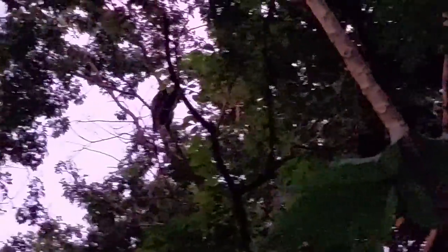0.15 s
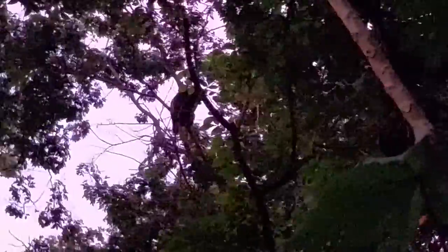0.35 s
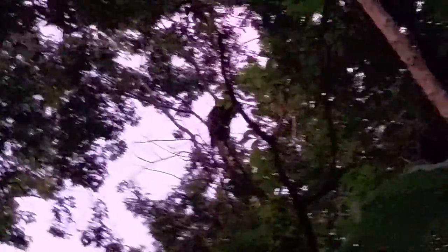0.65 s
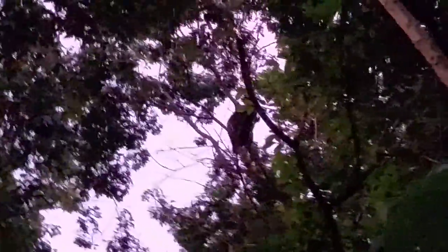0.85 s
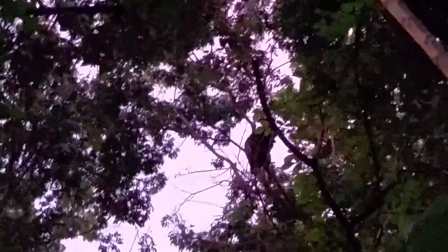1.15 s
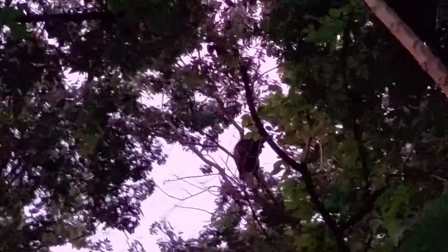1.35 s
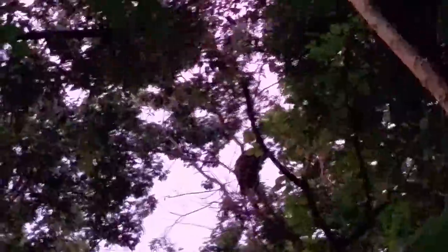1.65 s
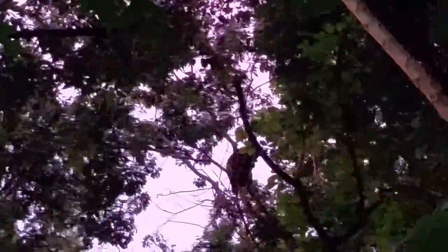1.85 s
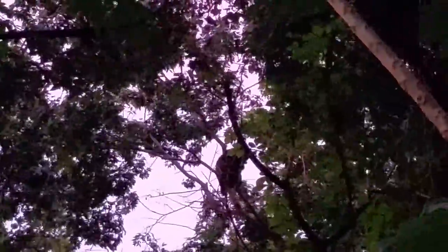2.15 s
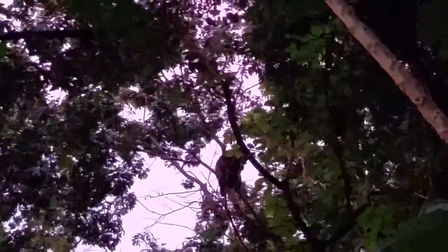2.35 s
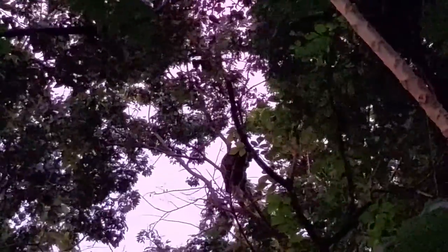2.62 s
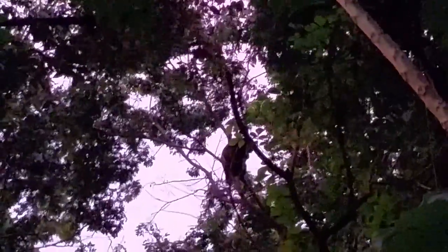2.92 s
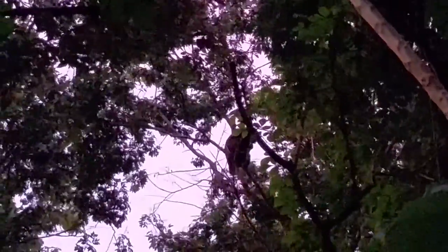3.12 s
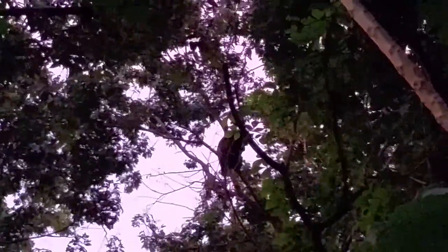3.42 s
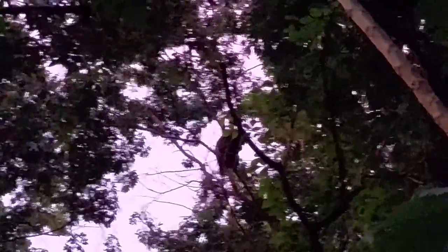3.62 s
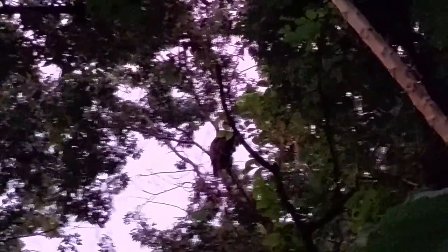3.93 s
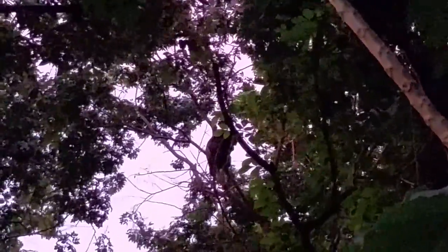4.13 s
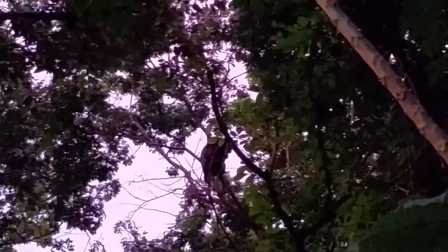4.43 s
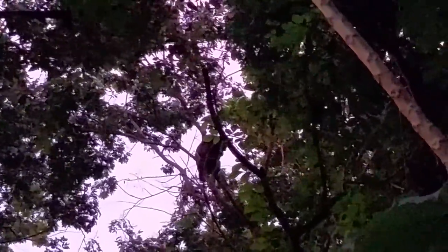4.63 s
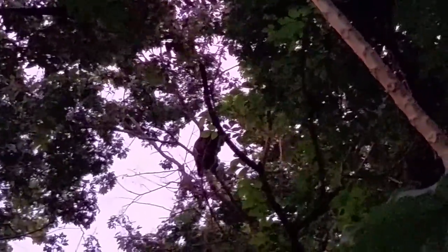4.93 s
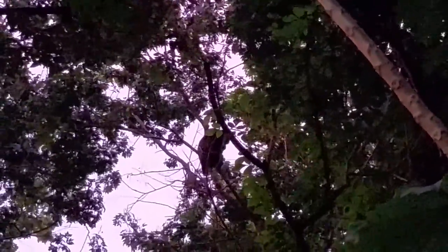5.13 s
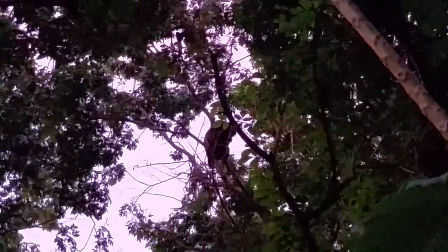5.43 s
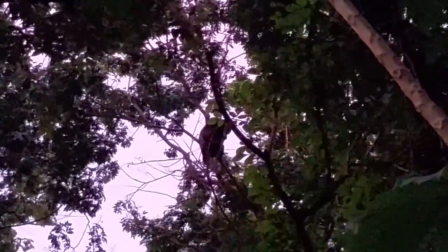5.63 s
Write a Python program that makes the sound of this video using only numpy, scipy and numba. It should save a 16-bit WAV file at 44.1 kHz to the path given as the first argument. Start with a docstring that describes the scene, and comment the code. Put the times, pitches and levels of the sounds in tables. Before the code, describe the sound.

Deep, hollow, raspy monkey barks come in quick pairs, then singly, then fade to a short muffled grunt, echoing between trees. Thin cricket trills flutter throughout and a katydid rasps three quick runs of ticking chirps. Late on, a twig cracks lightly. A far motor drones under a dull outdoor rumble, all heard by a single mono microphone below the canopy.

```python
"""A howler monkey barks from a treetop at dusk: two double barks, a single one and a soft grunt, ringing on
in the forest. Rough throat pulses ring the sac and mouth, and puffs of air ring the higher resonances.
A cricket trills on a fluttering tone, a katydid scrapes three runs of chirps from swelling file strokes,
a twig snaps as decaying sines, and a motor hums far off as three thin lines.
Shaped noise gives a low rumble and faint hiss; one microphone hears it all."""
import sys
import numpy as np
from scipy import signal
from scipy.fft import rfft, irfft, next_fast_len
from scipy.io import wavfile
from scipy.ndimage import uniform_filter1d, minimum_filter1d
from numba import njit

SR = 44100
rng = np.random.default_rng(int(sys.argv[2]) if len(sys.argv) > 2 else 0)


def dump_mix(stems):
    """Bounce the given channels to the path in sys.argv[1] as a 16-bit WAV at rate SR."""
    frames = np.atleast_2d(stems).T  # one column per channel
    limited = np.clip(frames, -1, 1)  # hard clip at full scale
    pcm = np.round(limited * 32767).astype(np.int16)
    wavfile.write(sys.argv[1], SR, pcm)


N = 254626
TIME = np.arange(N) / SR  # s

# Cricket trills. Each row: start in seconds, length in seconds, relative level in dB.
TRILLS = [(-0.08, 0.17, -64), (0.252, .14, -56), (1.760, .09, -50.5), (2.260, 0.2, -60.5),
          (2.715, 0.16, -58.5), (3.243, 0.15, -56.5), (3.375, .22, -65.5), (3.678, .19, -58),
          (3.977, 0.14, -59.5), (4.171, .15, -56.5), (4.540, 0.14, -62.5), (4.734, 0.2, -61),
          (5.06, .34, -62), (5.696, .15, -59.5)]
TRILL_ATTACK_S, TRILL_RELEASE_S = 0.032, 0.045

# Distant motor. Each row: time in seconds, relative level of the shaft line in dB, of the wavering line in dB.
MOTOR = [(0.0, -39.5, -33.5), (1.979, -39, -30), (5.77, -40.5, -41.5)]

# Spectrum of the far rumble and air. Each row: frequency in Hz, relative density in dB per Hz.
AIR_SPECTRUM = [(15, -38), (25, -45.5), (60, -1), (114, -2), (194, -5), (240, -9), (289, -14), (506, -24.5),
                (696, -23), (1590, -46.5), (5400, -53), (6010, -51), (14400, -53)]
# Boost of the middle range, loud at the start and then sinking, before its wavering. Each row: time in seconds,
# gain in dB.
MIDDLE_BOOST = [(0, 9.5), (0.6, 5.5), (4.4, 0.5), (4.95, -2.5)]

# Katydid runs of six chirps. Each row: first chirp in seconds, last chirp in seconds, how early the middle
# ones come in seconds, relative level in dB, crescendo in dB per chirp.
CHIRP_RUNS = [(0.495, 0.888, 0.001, -41, 2.1), (2.780, 3.184, 0.009, -38.5, -0.3),
              (5.168, 5.558, 0.0, -38.5, 1.8)]
RUN_ARCH_DB = 4  # the ends of a run are about this much softer than its middle

# Barks, the first a faint catch of the throat, the last two a soft grunt.
# Each row: start in seconds, crest of effort in seconds, end in seconds, attack in seconds, release in seconds,
# sag of sac and mouth in dB/s, sac level in dB, mouth level in dB, upper resonance level in dB, rasp gain in dB,
# tone over roughness at the start in dB, open mouth in Hz, upper whistle in Hz, whistle level in dB.
BARKS = [(0.503, 0.515, 0.545, 0.0082, 0.024, 20, -32.5, -46, -65.5, -65.5, -1.5, 859.4, 4500, -69.5),
         (0.526, 0.589, 0.710, 0.024, 0.087, 21, -15, -22, -37.5, -53.5, -1.5, 847.8, 4560, -49),
         (0.683, 0.782, 1.024, 0.027, 0.033, 48, -15.5, -14, -31, -49, -2, 745, 5920, -37.5),
         (1.198, 1.280, 1.398, 0.032, 0.025, 46, -11, -14, -32, -47, -2, 833, 6060, -45),
         (1.399, 1.523, 1.659, 0.034, 0.045, 4.5, -12, -13.5, -31, -45.5, -1, 826, 5540, -42.5),
         (1.923, 1.991, 2.224, 0.028, 0.15, 28, -11, -17.5, -36, -48.5, -4.5, 827.5, 6140, -46),
         (2.521, 2.574, 2.608, 0.067, 0.033, 29.5, -20, -40, -66, -81, 6, 855.6, 6070, -89),
         (2.590, 2.611, 2.747, 0.03, 0.083, 47.5, -18, -34.5, -62, -79, 3, 852, 5996, -86.5)]
# Effort climbs to each crest and ebbs after it; sac and mouth follow only the climb.
CLIMB_DB_PER_S, EBB_DB_PER_S = 118.5, 109
# How much of that swing each part of the voice follows, in dB per dB.
SAC_FOLLOWS, MOUTH_FOLLOWS, RASP_FOLLOWS, WHISTLE_FOLLOWS = 0.6, 0.6, 0.76, 1.8
# The sac rests on one note; the mouth glides to its closed note shortly after each crest.
SAC_HZ, CLOSED_MOUTH_HZ, MOUTH_HOLD_S, MOUTH_CLOSE_S = 442.6, 762.3, 0.012, 0.055
# After the crest the folds lock onto the resonances, and the tone grows out of the roughness.
LOCKING_DB, LOCKING_S = 5, 0.07
# Bends of the voice away from its notes and back. Each row: centre in seconds, half length in seconds,
# sac shift in Hz, mouth shift in Hz, extra tone over roughness in dB.
BENDS = [(0.570, 0.064, -27.5, 5, 2), (0.920, 0.052, -120, -125, 0), (1.315, 0.036, 149.5, 44, 5),
         (1.585, 0.060, 69.5, -9, 0.5), (2.66, 0.091, -20, 21, 0)]
# Broad roar under the two low resonances. Each row: frequency in Hz, relative density in dB per Hz.
ROAR_SPECTRUM = [(60, -42), (190, -7), (330, -5), (560, 5), (900, -12), (1040, -17), (1200, -24),
                 (1700, -63), (5000, -90.5)]
ROAR_DB, ROAR_FROM_MOUTH = -2.0, 0.67  # its level follows a blend of the sac's and the mouth's
# High resonances of the throat, rung by the rasp. Each row: mean frequency in Hz, relative level in dB.
RASP_RESONANCES = [(2300, -4), (2900, -9), (3600, -8.5), (4330, -3), (5300, -5.5), (6150, -11), (7150, -10),
                   (8800, -25.5), (12300, -29.5)]
RASP_LAG_S, RASP_WANDER = 0.0069, 0.012  # the rasp starts later than the voice; spread of pitch, as a ratio
# Dip in the rasp's spectrum, lower in the first call. Each row: time in seconds, centre in Hz.
RASP_DIP = [(1.05, 2730), (1.15, 3440)]
RASP_DIP_WIDTH_HZ = 700.0

# Twig cracks. Each row: time in seconds, level in dB to which each resonance's own is added.
CRACKS = [(4.285, -41.5), (4.296, -39)]
# Resonances of the twig. Each row: frequency in Hz, relative level in dB, decay t60 in seconds.
TWIG_RESONANCES = [(1100, -7, 0.013), (1290, 6.5, 0.0091), (1720, -5, 0.015)]

# Forest reverberation. Each row: frequency in Hz, decay t60 in seconds.
FOREST_T60 = [(200, 0.29), (500, 1.98), (1500, 0.66), (4000, 1.4), (9000, 0.2)]
CUTOFF_HZ = 14650


def from_db(db):
    """Decibels to gain."""
    return 10 ** (np.asarray(db) / 20)


def rms_one(x):
    """Scale to an rms of 1."""
    return x / np.sqrt(np.mean(x ** 2) + 1e-20)


def at_hz(points, hz):
    """Read a table on a log-frequency axis."""
    f, value = np.transpose(points)
    return np.interp(np.log(np.maximum(hz, 1)), np.log(f), value)


def colour(x, spectrum):
    """Give a signal a smooth spectrum; rms 1."""
    size = next_fast_len(N + 4096)
    gain = from_db(at_hz(spectrum, np.fft.rfftfreq(size, 1 / SR)))
    return rms_one(irfft(rfft(x, size) * gain, size)[:N])


def drift(rate_hz):
    """Random wander with a spread of 1: noise through two equal low-passes, at a twentieth of the sample rate."""
    r = np.exp(-40 * np.pi * rate_hz / SR)
    noise = rng.standard_normal(N // 20 + 2002)
    slow = signal.lfilter([1], [1, -2 * r, r * r], noise)[2000:]
    return np.interp(np.arange(N) / 20, np.arange(len(slow)), rms_one(slow))


def tone(hz):
    """A sine of rms 1 that follows a pitch curve."""
    return np.sqrt(2) * np.sin(2 * np.pi * np.cumsum(hz) / SR)


def even(x, size=900):
    """Hold the level at rms 1 while keeping the grain of single pulses."""
    power = uniform_filter1d(uniform_filter1d(x ** 2, size), size)
    return x / np.sqrt(np.maximum(power, 1e-12))


def low_pass(x, hz):
    """Steep low-pass."""
    return signal.sosfilt(signal.butter(6, hz, fs=SR, output="sos"), x)


def band_pass(x, low_hz, high_hz, run):
    """Keep one band, with the given filter routine."""
    return run(signal.butter(2, [low_hz, high_hz], "band", fs=SR, output="sos"), x)


@njit
def resonate(x, hz, width):
    """Two-pole resonance with a moving centre."""
    y, r = np.zeros(len(x)), np.exp(-np.pi * width / SR)
    for i in range(2, len(x)):
        drive = (1 - r * r) / 2 * (x[i] - x[i - 2])
        y[i] = drive + 2 * r * np.cos(2 * np.pi * hz[i] / SR) * y[i - 1] - r * r * y[i - 2]
    return y


def twice(x, hz, width_hz):
    """A resonance applied twice, for steep flanks."""
    return resonate(resonate(x, hz, float(width_hz)), hz, float(width_hz))


def gate(start, end, attack, release):
    """Attack, hold and release as straight ramps of gain."""
    return np.clip(np.minimum((TIME - start) / attack, (end - TIME) / release), 0, 1)


def cricket(pitch_hz, wing_hz, flutter_db):
    """Wing strokes run together into a note that flutters in pitch and level."""
    level = np.zeros(N)
    for start, length, db in TRILLS:
        level += from_db(db) * gate(start, start + length, TRILL_ATTACK_S, TRILL_RELEASE_S)
    stroke = np.sin(2 * np.pi * np.cumsum(wing_hz * (1 + 0.41 * drift(12))) / SR)
    pitch = pitch_hz + 22 * stroke + 34 * drift(120)
    flutter = from_db(flutter_db * drift(29) - 3.5)
    return level * (1 + 0.48 * stroke) * flutter * tone(pitch)


def motor(shaft_hz, throb_hz, mains_hz, mains_db):
    """A steady shaft line, a wavering one above it and a thin mains hum."""
    s, shaft_db, throb_db = np.transpose(MOTOR)
    shaft = from_db(np.interp(TIME, s, shaft_db) + 0.5) * tone(shaft_hz + drift(3.4))
    throb_gain = from_db(np.interp(TIME, s, throb_db) - 7.5 + 4.7 * drift(6.1))
    throb = throb_gain * tone(throb_hz + 3.2 * drift(6.3))
    return shaft + throb + from_db(mains_db) * tone(np.full(N, mains_hz))


def air(level_db, waver_db, patchy_db):
    """Far rumble over a faint steady hiss, with a middle-range wash that starts loud, sinks and swells
    unevenly, band by band."""
    noise = colour(rng.standard_normal(N), AIR_SPECTRUM)
    middle_db = np.interp(TIME, *np.transpose(MIDDLE_BOOST)) + waver_db * drift(13.0)
    out = noise
    for low, high in ([280, 500], [500, 950], [950, 1700]):  # Hz
        part = band_pass(noise, low, high, signal.sosfiltfilt)
        out = out + part * (from_db(middle_db + patchy_db * drift(4.9)) - 1)
    return from_db(level_db) * out


def chirps(count=6):
    """Time and level of each chirp: a nearly steady beat, arched in level and tilted by the crescendo."""
    k, ends = np.arange(count), np.linspace(-1, 1, count) ** 2
    runs = []
    for first, last, early, db, crescendo in CHIRP_RUNS:
        times = np.linspace(first, last, count) - early * (1 - ends)
        levels = db + crescendo * (k - k.mean()) - RUN_ARCH_DB * ends
        runs.append(np.column_stack([times, levels]))
    return np.vstack(runs)


def katydid(stroke_gap_s, stroke_s, last_hz, step_hz, sweep_hz, swell_db, count=4):
    """Each chirp is a few swelling file strokes; each slides down and lies on average below the one before."""
    out = np.zeros(N)
    t = np.arange(-256, 256) / SR
    for s, db in chirps():
        # k counts back from the last stroke
        for k, (detune, late, louder) in enumerate(rng.standard_normal((count, 3))):
            hz = last_hz + step_hz * k + 150 * detune
            phase = 2 * np.pi * (hz * t - sweep_hz * t ** 2 / (2 * stroke_s))
            gain = from_db(db - swell_db * k ** 2 + louder)
            at = int((s - k * stroke_gap_s + 0.00083 * late) * SR) - len(t) // 2
            out[at:at + len(t)] += gain * np.exp(-(t / stroke_s) ** 2) * np.sin(phase)
    return out


def effort_db(crest):
    """The climb to a crest of effort, and the whole climb and ebb; 0 dB at the crest."""
    climb = CLIMB_DB_PER_S * np.minimum(TIME - crest, 0)
    return climb, climb - EBB_DB_PER_S * np.maximum(TIME - crest, 0)


def bark_shapes():
    """Gains of sac, mouth, upper resonance and rasp: each bark opens, climbs to its crest, falls, is released."""
    gains = np.zeros((4, N))
    for start, crest, end, attack, release, sag, sac_db, mouth_db, upper_db, rasp_db, *_ in BARKS:
        climb, effort = effort_db(crest)
        sagged = sag * np.maximum(TIME - crest, 0)
        voiced = gate(start, end, attack, release)
        rushing = gate(start + RASP_LAG_S, end, attack, release)
        gains = np.maximum(gains, [voiced * from_db(sac_db + SAC_FOLLOWS * climb - sagged),
                                   voiced * from_db(mouth_db + MOUTH_FOLLOWS * climb - sagged),
                                   voiced * from_db(upper_db + effort),
                                   rushing * from_db(rasp_db + RASP_FOLLOWS * effort)])
    return gains


def throat():
    """Sac pitch, mouth pitch and lock of the folds: each bark resets the mouth and the roughness."""
    mouth_hz, lock_db = np.full(N, float(CLOSED_MOUTH_HZ)), np.zeros(N)
    for start, crest, *_, tone_db, open_hz, _, _ in BARKS:
        now = TIME >= start
        past_crest = TIME[now] - crest
        closed = np.clip((past_crest - MOUTH_HOLD_S) / MOUTH_CLOSE_S, 0, 1)
        mouth_hz[now] = open_hz + (CLOSED_MOUTH_HZ - open_hz) * closed
        lock_db[now] = tone_db + LOCKING_DB * np.clip(past_crest / LOCKING_S, 0, 1)
    bends = np.zeros((3, N))
    for s, half, *change in BENDS:
        bends += np.outer(change, np.exp(-((TIME - s) / half) ** 2))
    sac_bend, mouth_bend, purer_db = bends
    mouth_hz, lock_db = uniform_filter1d([mouth_hz, lock_db], size=900)
    return SAC_HZ + sac_bend, mouth_hz + mouth_bend, from_db(lock_db + purer_db)


def larynx(pulse_hz, jitter, shimmer_db, noise_share):
    """Irregular slaps of the vocal folds, and turbulence that puffs with each slap."""
    cycles = np.cumsum(pulse_hz * np.exp(jitter * drift(60.17))) / SR
    slaps = np.diff(np.floor(cycles), prepend=0) * from_db(shimmer_db * drift(75))
    puffs = rms_one(rng.standard_normal(N) * (0.35 + np.exp(-3 * (cycles % 1))))
    return rms_one(slaps) + noise_share * puffs, puffs


def formant(x, hz, width_hz, top_hz):
    """A steep resonance, dark above top_hz; level held at 1."""
    return even(low_pass(twice(x, hz, width_hz), top_hz))


def rasp(puffs, width_hz, patchy_db):
    """Puffs of air ring the high resonances, each swelling and sinking by itself; one band is weaker."""
    out = np.zeros(N)
    for hz, db in RASP_RESONANCES:
        gain = from_db(db + patchy_db * drift(14))
        out += gain * even(twice(puffs, hz * (1 + RASP_WANDER * drift(18)), width_hz))
    dip_hz = np.interp(TIME, *np.transpose(RASP_DIP))
    for _ in range(2):
        out = out - resonate(out, dip_hz, RASP_DIP_WIDTH_HZ)
    return out


def whistles(puffs, width_hz, lower_ratio, lower_db):
    """Near each crest the rush of air rings a pair of narrow resonances."""
    out = np.zeros(N)
    for start, crest, end, attack, release, *_, hz, db in BARKS:
        high = even(twice(puffs, np.full(N, float(hz)), width_hz))
        low = even(twice(puffs, np.full(N, float(hz * lower_ratio)), width_hz))
        gain = from_db(db + WHISTLE_FOLLOWS * effort_db(crest)[1])
        out += gate(start, end, attack, release) * gain * (high + from_db(lower_db) * low)
    return out


def monkey():
    """Rough pulses ring the throat sac and the mouth; the folds partly lock onto both and sing wavering tones."""
    sac_gain, mouth_gain, upper_gain, rasp_gain = bark_shapes()
    sac_hz, mouth_hz, lock = throat()
    pulses, puffs = larynx(pulse_hz=93.68, jitter=0.3, shimmer_db=3.0, noise_share=0.95)
    sac_pitch = sac_hz * (1 + 0.02574 * drift(56))
    # every second cycle differs a little, which adds a line an octave down
    sac_tone = tone(sac_pitch) + 0.065 * tone(sac_pitch / 2)
    sac = even(formant(pulses, sac_hz, width_hz=107, top_hz=770) + lock * sac_tone)
    mouth_tone = tone(mouth_hz * (1 + 0.0135 * drift(60)))
    mouth = even(formant(pulses, mouth_hz, width_hz=75.4, top_hz=1130) + lock * mouth_tone)
    # the upper resonance follows the mouth a little and has a weaker neighbour below it
    upper_hz = 1475 * (mouth_hz / 800) ** 0.19
    neighbour = formant(pulses, 0.9 * upper_hz, width_hz=71, top_hz=1450)
    upper = even(formant(pulses, upper_hz, width_hz=100, top_hz=1830) + 0.5 * neighbour)
    # the broad roar gives way as the folds lock
    roar_gain = from_db(ROAR_DB) * sac_gain ** (1 - ROAR_FROM_MOUTH) * mouth_gain ** ROAR_FROM_MOUTH
    roar = even(colour(pulses, ROAR_SPECTRUM)) * roar_gain / np.sqrt(1 + lock ** 2)
    hiss = rasp_gain * rasp(puffs, width_hz=370, patchy_db=3.5)
    hiss = hiss + whistles(puffs, width_hz=230, lower_ratio=0.822, lower_db=-4.5)
    return sac * sac_gain + mouth * mouth_gain + upper * upper_gain + roar + hiss


def twig():
    """Two quick cracks ring a dry twig as decaying sines, dulled by distance."""
    out = np.zeros(N)
    age = TIME[:N // 20]
    for s, db in CRACKS:
        at = int(s * SR)
        for hz, mode_db, t60 in TWIG_RESONANCES:
            out[at:at + len(age)] += from_db(db + mode_db - 60 * age / t60) * np.sin(2 * np.pi * hz * age)
    return low_pass(out, hz=2400)


def forest(x, leaves_db, leaves_t60, tail_db):
    """Nearby leaves scatter the sound; far trunks add a tail with its own decay in each band."""
    t = TIME[:int(1.6 * SR)]
    edges_hz = np.geomspace(100, 14000, 8)
    scatter = rng.standard_normal(len(t)) * from_db(-60 * t / leaves_t60) * (t > 0.002)
    response = from_db(leaves_db) * rms_one(scatter) / np.sqrt(len(t))
    for low, high in zip(edges_hz, edges_hz[1:]):
        band = band_pass(rng.standard_normal(len(t)), low, high, signal.sosfilt)
        # the tail builds up over some 25 ms before it dies
        fade = from_db(-60 * t / at_hz(FOREST_T60, np.sqrt(low * high))) * (1 - np.exp(-t / 0.025))
        response = response + from_db(tail_db) * band * rms_one(fade) / np.sqrt(len(t))
    return x + signal.fftconvolve(x, response)[:N]


def scene():
    """All sources at one microphone; the animals and the twig each ring in the forest."""
    trills = cricket(pitch_hz=6079, wing_hz=45.8, flutter_db=4.5)
    hum = motor(shaft_hz=81.8, throb_hz=116.7, mains_hz=238.0, mains_db=-46)
    rumble = air(level_db=-38, waver_db=2.44, patchy_db=1.56)
    scrapes = katydid(stroke_gap_s=0.0061, stroke_s=0.0018, last_hz=7920, step_hz=170, sweep_hz=555, swell_db=1.0)
    insects = forest(trills + scrapes, leaves_db=-6.5, leaves_t60=0.015, tail_db=-11)
    voice = forest(monkey(), leaves_db=-6.5, leaves_t60=0.31, tail_db=-17.0)
    snap = forest(twig(), leaves_db=-6, leaves_t60=0.093, tail_db=-3.0)
    return (voice + insects + snap + hum + rumble)[None]


def record(dry):
    """Behind the microphone, a limiter eases the gain down around peaks above 0.95, and the top is cut."""
    allowed = np.minimum(1, 0.95 / (np.abs(dry) + 1e-9))
    gain = uniform_filter1d(uniform_filter1d(minimum_filter1d(allowed, size=401), size=201), size=201)
    return signal.sosfilt(signal.ellip(12, 0.1, 80, CUTOFF_HZ, fs=SR, output="sos"), dry * gain)


dry = scene()
out = record(dry)
dump_mix(out)
```